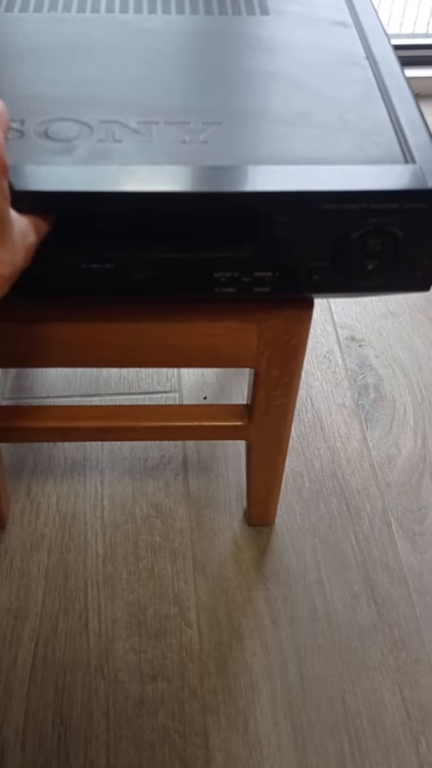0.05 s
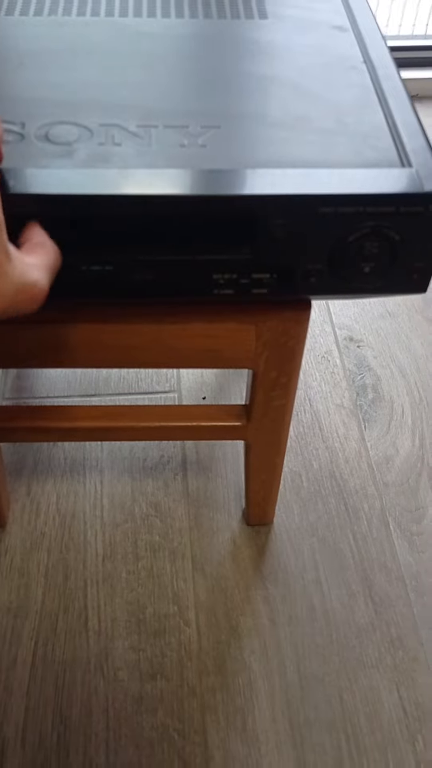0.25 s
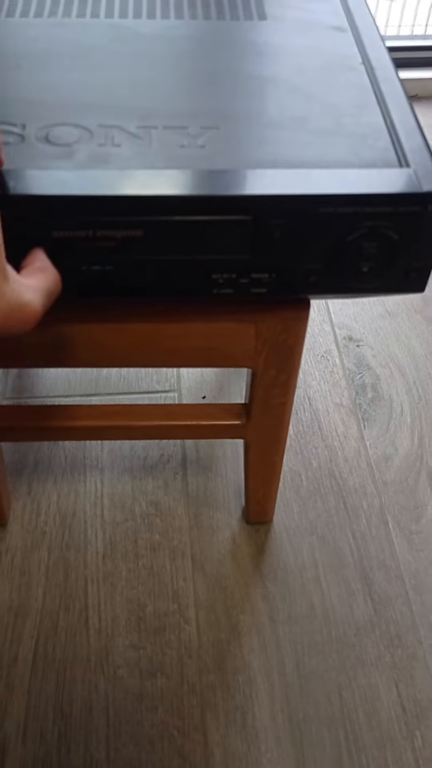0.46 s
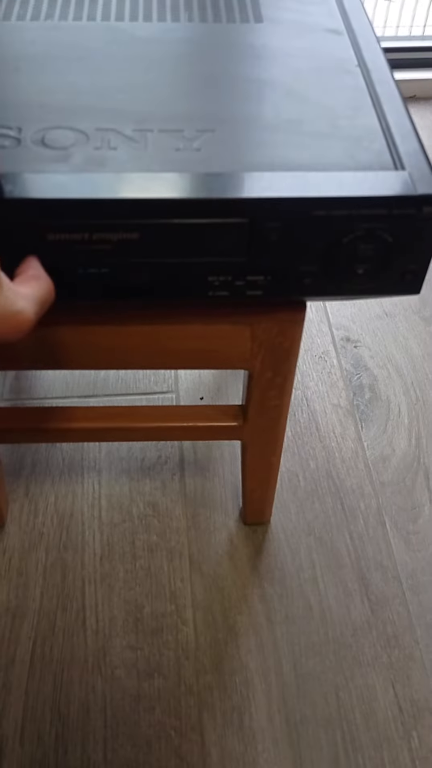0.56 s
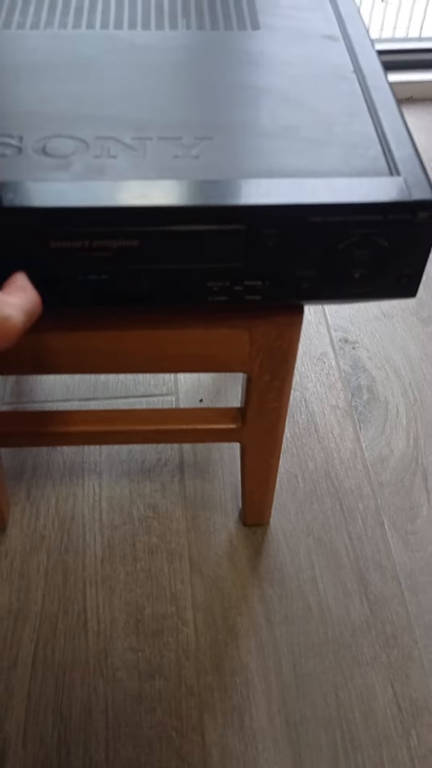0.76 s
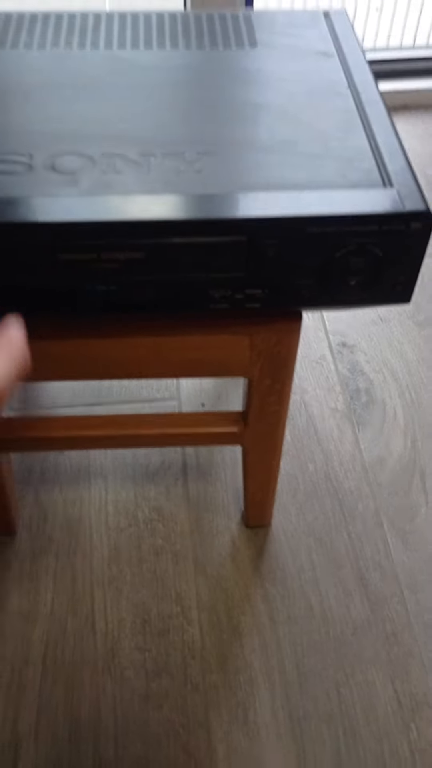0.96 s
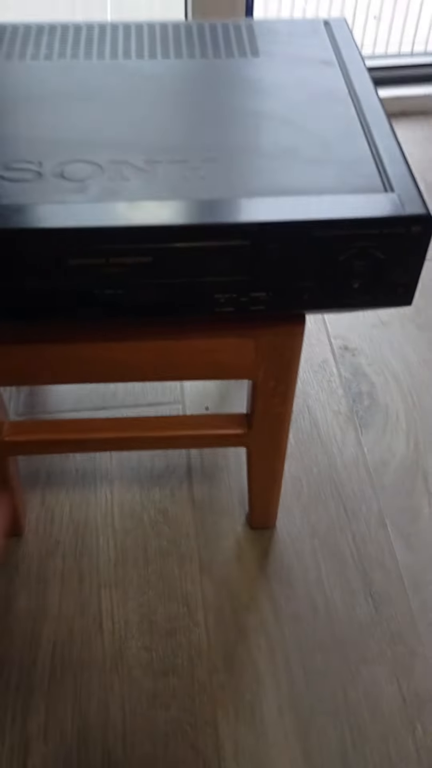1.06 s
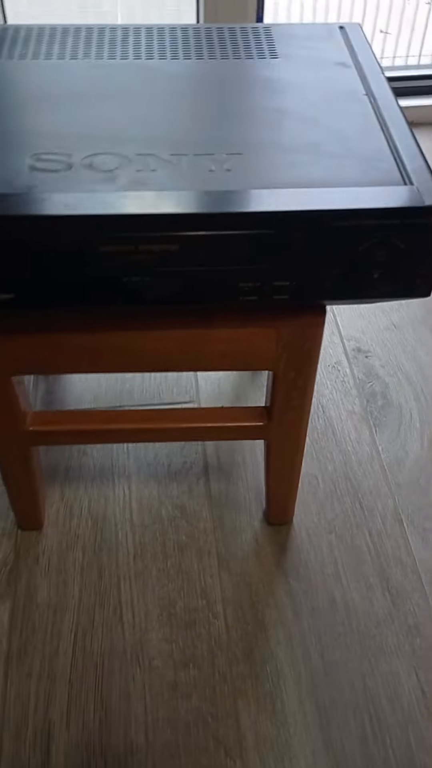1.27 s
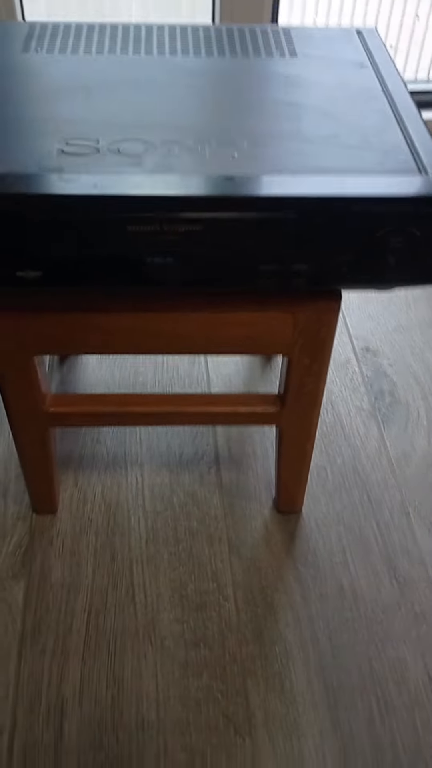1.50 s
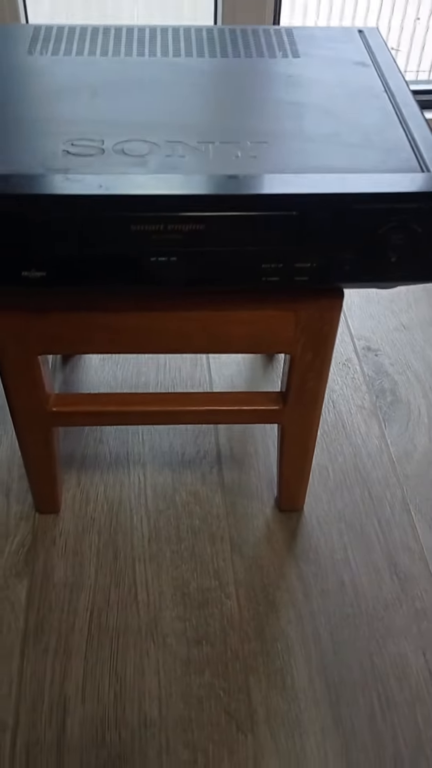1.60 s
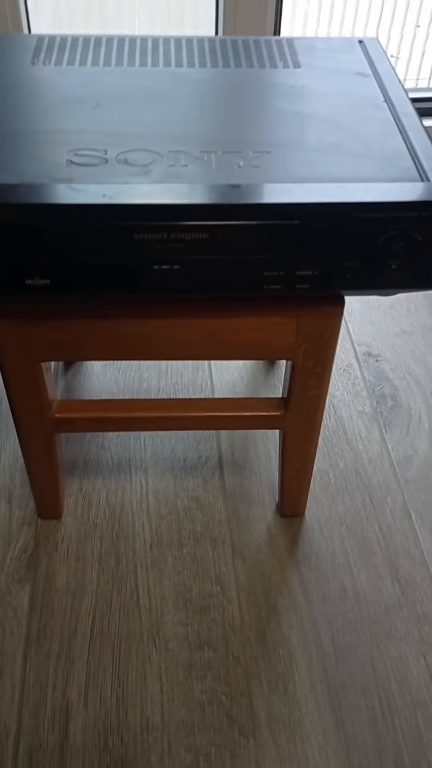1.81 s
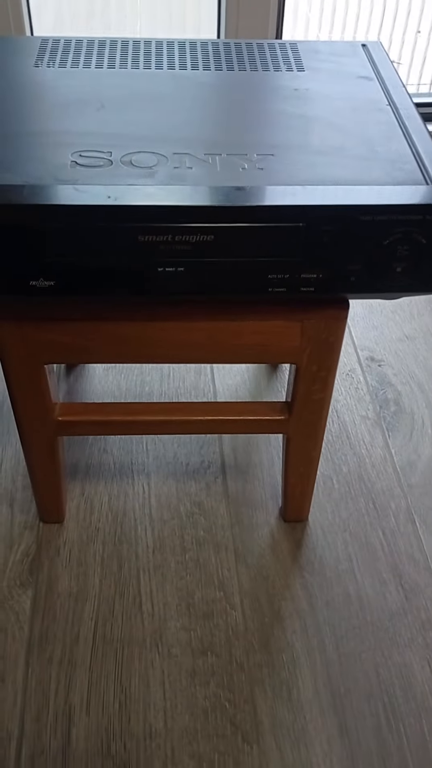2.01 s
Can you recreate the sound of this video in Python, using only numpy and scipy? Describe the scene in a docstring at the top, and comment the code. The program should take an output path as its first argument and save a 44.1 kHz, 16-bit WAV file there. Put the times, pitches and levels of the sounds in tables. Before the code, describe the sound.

A cassette slides rattling into a video recorder and drops with a loud clunk that rings the metal case. A short motor whir with grinding gears follows, then a sharp click and faint ticks in a quiet room.

```python
"""A small, quiet room, with the thin whistle of a picture tube. A cassette is pushed into a video tape
deck: its plastic shell scrapes and rattles through the slot and clacks the flap, then the carriage
clunks and rings the sheet-metal case. The loading motor whirs through its gears, a latch snaps and
small parts settle."""
import sys
import numpy as np
from scipy import signal
from scipy.fft import rfft, irfft
from scipy.io import wavfile
from scipy.ndimage import uniform_filter1d

SR = 44100
rng = np.random.default_rng(int(sys.argv[2]) if len(sys.argv) > 2 else 0)


def master(y):
    """Save y as 16-bit WAV."""
    cut = np.clip(np.atleast_2d(y).T, -1, 1)
    pcm = np.round(cut * 32767)  # scale
    wavfile.write(sys.argv[1], SR, pcm.astype(np.int16))


N = 90404
T = np.arange(N) / SR

# Blows inside the deck. Each row: start in seconds, relative level in dB, rattle decay in seconds,
# tilt in dB per octave, relative level of the case boom in dB.
SHELL_KNOCKS = [(0.0502, -27.5, .004, 1.5, -35), (.1032, -26, .012, 0, -34.5),
                (0.1578, -23, .004, 1.5, -33.5), (.2099, -10.5, .005, -0.5, -28),
                (0.253, -11.5, .005, 1.5, -20), (0.2834, -11, .005, -0.5, -27), (.301, -6, .008, 1, -15),
                (0.3081, -3.5, 0.0074, 4, -12.5), (0.3269, -2.5, .005, -0.5, -9),
                (.341, -11, 0.002, -6.5, -7.5), (.386, -3.5, .003, -9, -15.5),
                (0.4258, -9, .006, -3.5, -17.5), (.444, -25, .004, -6.5, -17)]
CARRIAGE_CLUNKS = [(0.471, -4, .008, -1, -31), (0.4813, 6.5, 0.009, 1.5, -7),
                   (0.4864, 1.5, .003, -5.5, -22.5), (0.5058, 4.5, .004, -1, 3),
                   (0.516, -6, .004, -0.5, -21), (.541, -4, .006, -3, -12.5), (.553, -27.5, .005, -4, -13)]
GEAR_CLACKS = [(.70, -24, 0.005, -2.5, -18), (0.728, -13.5, 0.017, -2, -24),
               (0.761, -19.5, 0.0049, -4, -31), (0.8754, -24, 0.0064, 3.5, -35),
               (0.99, -12.5, 0.0068, 3, -34), (1.002, -22, 0.0026, -1, -55), (1.0222, -15, 0.014, 2.5, -55),
               (1.12, -21, 0.0077, -4, -30), (1.137, -27, 0.0043, -4, -42),
               (1.2094, -30.5, 0.021, 0.5, -60)]
# Tone colours of the cassette shell and the gears. Each row: frequency in Hz, level in dB.
SHELL_COLOUR = [(60, -27), (200, -11), (450, 0), (640, -2.5), (1050, -2), (1500, -3), (2050, -0.5),
                (3000, -7), (3800, -9), (4100, -4), (4380, -9.5), (4650, -1.5), (4950, -8.5), (5400, -5),
                (5750, -8), (6700, -4), (7200, -8), (8000, -18.5), (10000, -30), (15000, -48.5)]
GEAR_COLOUR = [(60, -25.5), (250, -9), (450, 1.5), (950, 4.5), (1500, -2), (2400, -4), (4400, -13.5),
               (6800, -13.5), (8200, -27.5), (12000, -53), (15000, -52)]


def amp(db):
    """Decibels to gain."""
    return 10 ** (np.asarray(db) / 20)


def unit(x):
    """Scale to an energy of one."""
    return x / np.sqrt(np.sum(x ** 2) + 1e-18)


def curve(rows, column=1):
    """One column of a table, joined by straight lines in time."""
    rows = np.array(rows)
    return np.interp(T, rows[:, 0], rows[:, column])


def through(x, response):
    """Pass a sound through an impulse response."""
    return signal.fftconvolve(x, response)[:N]


def colour(points, tilt_db=0, size=4096):
    """Causal response of unit energy with the given spectrum, tilted per octave."""
    octave = np.log2(np.maximum(np.fft.rfftfreq(size, 1 / SR), 10))
    hz, db = np.array(points).T
    tilt = tilt_db * np.clip(octave, np.log2(250), np.log2(8000))
    cepstrum = irfft(np.log(amp(np.interp(octave, np.log2(hz), db) + tilt)))
    cepstrum[1:size // 2] *= 2  # minimum phase keeps attacks sharp
    cepstrum[size // 2 + 1:] = 0
    return unit(irfft(np.exp(rfft(cepstrum))))


def even(x, width_hz):
    """Smooth out chance peaks and holes in the spectrum of a burst."""
    size = 4 * len(x)
    spectrum = rfft(x, size)
    power = uniform_filter1d(abs(spectrum) ** 2, max(int(width_hz * size / SR), 1))
    return unit(irfft(spectrum / np.sqrt(power + 1e-6 * power.mean()))[:len(x)])


def tail(t60, build_s):
    """Dense, diffuse ringing that lasts t60 seconds at 1 kHz; the treble dies first."""
    t = T[:2 ** 15]
    noise = rfft(rng.standard_normal(len(t)))
    octave = np.clip(np.log2(np.fft.rfftfreq(len(t), 1 / SR) / 1000 + 1e-9), -3, 3)
    wash = np.zeros(len(t))
    for k in range(-3, 4):
        band = irfft(noise * np.maximum(1 - abs(octave - k), 0))
        band_t60 = t60 * 2 ** (-0.26 * k)
        wash += band * np.exp(-np.log(1000) * t / band_t60)
    return even(wash * (1 - np.exp(-t / build_s)), width_hz=30)


def flutter(hz):
    """Quick random wavering, rms one."""
    return unit(uniform_filter1d(rng.standard_normal(N), int(SR / hz))) * np.sqrt(N)


def grit():
    """Dense tiny contacts of uneven strength, rms one."""
    return unit(rng.standard_normal(N) * np.exp(0.38 * rng.standard_normal(N))) * np.sqrt(N)


def friction(levels, spectrum, tilt_db=0):
    """Rubbing surfaces: grit in the colour of the part, following a level curve."""
    return amp(curve(levels)) * through(grit(), colour(spectrum, tilt_db))


def strikes(rows):
    """One impulse for each (seconds, dB)."""
    out = np.zeros(N)
    for s, db in rows:
        out[int(s * SR)] += amp(db)
    return out


def ring(force, modes):
    """A struck object rings in its decaying modes."""
    t = T[:SR // 2]
    response = sum((-1) ** k * amp(db) * np.sin(2 * np.pi * hz * t) * np.exp(-np.log(1000) * t / t60)
                   for k, (hz, db, t60) in enumerate(modes))
    return through(force, response)


def rattles(rows, spectrum, rise_s, size=4096):
    """Each blow swells, chatters briefly and takes on the colour of the part."""
    out, contacts, t = np.zeros(N), grit(), T[:size]
    for s, db, rattle_s, tilt_db, _ in rows:
        start = int(s * SR)
        envelope = (1 - np.exp(-t / rise_s)) * np.exp(-t / rattle_s)
        burst = even(contacts[start:start + size] * envelope, width_hz=340)
        blow = amp(db) * unit(signal.fftconvolve(burst, colour(spectrum, tilt_db)))
        out[start:start + len(blow)] += blow
    return out


def room_air():
    """Still air: a faint, dark bed of noise."""
    # Colour of the air. Each row: frequency in Hz, level in dB.
    spectrum = [(25, -19.5), (55, 10), (100, 2), (220, 6), (450, -3.5), (1000, -6), (2500, -22),
                (7000, -25.5), (9000, -37.5), (15000, -41)]
    return amp(-76) * through(rng.standard_normal(N), colour(spectrum))


def tube_whistle(hz=15623):
    """The picture tube holds one thin, high pitch while its level flickers."""
    # Swells and dips of the whistle. Each row: time in seconds, rms level in dB.
    levels = [(0.0, -70.5), (0.14, -73), (0.25, -84), (0.28, -74), (0.46, -71), (0.48, -57), (0.56, -66),
              (0.59, -71.5), (0.89, -64), (0.99, -78), (1.05, -64.5), (1.12, -68), (1.37, -65.5),
              (1.41, -52), (1.44, -64.5), (1.87, -81), (1.94, -73.5), (2.05, -75)]
    envelope = np.sqrt(2) * amp(curve(levels)) * (1 + 0.1 * flutter(110))
    return envelope * np.sin(2 * np.pi * hz * T)


def shell_scrape():
    """The shell's edge rasps into the slot and its body slides in with a duller rub."""
    # Friction of the body and of the edge. Each row: time in seconds, level in dB.
    slide = [(0, -99), (.045, -90), (.08, -59), (.13, -66), (.20, -62.5), (.23, -50.5), (.29, -50.5),
             (.35, -45), (.41, -51), (.46, -56.5), (.50, -82)]
    rasp = [(.045, -95), (.053, -57), (.08, -72), (.09, -56.5), (.125, -56), (.15, -65), (.20, -71),
            (.24, -100)]
    # Colour of the rasp. Each row: frequency in Hz, level in dB.
    rasp_colour = [(300, -24.5), (900, -11.5), (1250, -1), (2300, 3.5), (3100, -8.5), (4200, -7),
                   (5000, -16.5), (6600, -11.5), (8000, -28.5), (15000, -48.5)]
    return friction(slide, SHELL_COLOUR, tilt_db=-3) + friction(rasp, rasp_colour)


def deck_thuds():
    """Soft, low swells of noise as the deck shifts."""
    # Bumps and groans. Each row: peak time in seconds, level in dB, pitch in Hz, half-width in seconds.
    bumps = [(.04, -67.5, 380, .035), (0.9, -55.5, 180, 0.027), (1.352, -63.5, 180, 0.018),
             (1.36, -74, 92, 0.022), (1.71, -74, 54, .04), (1.594, -70, 630, 0.019),
             (0.745, -57.5, 388, 0.041), (0.42, -46.5, 380, 0.0028), (.515, -49, 140, 0.008),
             (1.94, -71, 530, 0.026)]
    out = np.zeros(N)
    for s, db, hz, width_s in bumps:
        spectrum = [(hz / 4, -35), (hz / 1.4, -9), (hz, 0), (hz * 1.4, -11), (hz * 4, -55)]
        band = through(rng.standard_normal(N), colour(spectrum))
        swell = np.exp(-.5 * ((T - s) / width_s) ** 2)
        out += amp(db) * unit(band * swell) * np.sqrt(2 * width_s * SR)
    return out


def loading_blows():
    """The shell knocks, the carriage clunks and the gears clack; the panels ring on."""
    # Colour of the carriage. Each row: frequency in Hz, level in dB.
    carriage_colour = [(60, -27), (135, -7.5), (214, -13.5), (400, 0.5), (750, -3), (1130, -4), (1540, -1),
                       (2300, -6), (3000, -11), (3900, -3), (5550, -2), (6700, -3.5), (7800, -17),
                       (9100, -14), (10000, -23), (15000, -40)]
    knocks = amp(-8) * rattles(SHELL_KNOCKS, SHELL_COLOUR, rise_s=.0018)
    clunks = amp(-8.5) * rattles(CARRIAGE_CLUNKS, carriage_colour, rise_s=.002)
    clacks = amp(-7) * rattles(GEAR_CLACKS, GEAR_COLOUR, rise_s=.0044)
    blows = knocks + clunks + clacks
    panels = through(blows, tail(t60=.35, build_s=.0028))
    return amp(-1) * blows + amp(-5.5) * panels


def body_resonance(soft_contact_hz=1100):
    """Every blow booms in the case, the hard carriage most brightly; knocks also ring the shell."""
    # Modes of the metal case and the hollow shell. Each row: pitch in Hz, level in dB, t60 in seconds.
    case_modes = [(73, -19.5, 0.7), (137, -14.5, 0.35), (236.4, -17, 0.47), (294.8, -5, 0.13),
                  (338.5, -2.5, .38), (377, 2.5, 0.44), (456, -2, 0.45), (480.4, -1, 0.4), (718, -5, .25),
                  (755, 3, 0.19), (827, -9, .22), (1468, -7.5, 0.088), (1528, -5.5, .25), (4060, -10, 0.12),
                  (4250, -7.5, 0.16), (4620, -25.5, .22), (5537, -13.5, .24), (6750, -12, 0.22),
                  (9300, -24, .2)]
    shell_modes = [(440, -2, 0.18), (618, 2.5, 0.22), (816, 1, 0.31), (1714, -7.5, .12), (1995, -5, .14),
                   (2300, -5, .14), (6690, -7.5, .08)]
    soften = signal.butter(2, soft_contact_hz, fs=SR, output="sos")
    soft = signal.sosfilt(soften, strikes((s, db) for s, *_, db in SHELL_KNOCKS + GEAR_CLACKS))
    hard = strikes((s, db) for s, *_, db in CARRIAGE_CLUNKS)
    knocks = strikes(row[:2] for row in SHELL_KNOCKS)
    return amp(-43) * ring(soft + hard, case_modes) + amp(-47) * ring(knocks, shell_modes)


def slot_flap():
    """The flap clacks and its spring pings."""
    # Strikes on the flap and the spring. Each row: start in seconds, level in dB.
    hits = [(.2105, -45)]
    plucks = [(.4249, -68.5)]
    # Their modes. Each row: pitch in Hz, level in dB, t60 in seconds.
    flap_modes = [(820, -6, .08), (1130, -2, .1), (1213, -2.5, 0.27), (1343, -3, .08), (5200, -6, 0.077)]
    spring_modes = [(9880, 0.5, .07), (11300, -10, .04)]
    return ring(strikes(hits), flap_modes) + ring(strikes(plucks), spring_modes)


def gear_grind():
    """The gears grind in uneven surges."""
    # Friction of the gears. Each row: time in seconds, level in dB.
    levels = [(.62, -66.5), (.70, -64), (.745, -60), (.785, -62), (.81, -81), (.86, -75.5), (.89, -56.5),
              (.97, -61.5), (1.03, -53.5), (1.09, -59), (1.135, -56.5), (1.17, -79), (1.22, -74.5),
              (1.29, -85.5), (1.55, -75), (1.62, -71), (1.72, -78), (2.05, -85)]
    return friction(levels, GEAR_COLOUR)


def loading_motor():
    """The motor spins up, whines and winds down, each partial wavering under the load."""
    # The motor's run. Each row: time in seconds, base frequency in Hz, level in dB.
    run = [(.86, 132.5, -66), (.91, 141.3, -58.5), (.96, 149.8, -55.5), (1.04, 150.9, -57),
           (1.12, 151.9, -57), (1.2, 147.3, -70), (1.25, 134.8, -100)]
    # Shaft and gear partials. Each row: multiple of the base frequency, level in dB.
    partials = [(3, -3), (4, -3.5), (5, -12.5), (6, -6.5), (6.6, -7.5), (8.2, -13)]
    phase = 2 * np.pi * np.cumsum(curve(run) * (1 + .02 * flutter(100))) / SR
    whine = sum(amp(db) * (1 + 0.4 * flutter(70)) * np.sin(k * phase) for k, db in partials)
    running = (T > run[0][0]) & (T < run[-1][0])
    return running * amp(curve(run, column=2)) * whine


def sliding_parts():
    """Parts slide over each other with a soft hiss."""
    # Swells of the hiss. Each row: time in seconds, level in dB.
    levels = [(1.30, -95.5), (1.335, -77.5), (1.39, -75.5), (1.43, -87), (1.49, -77.5), (1.55, -82),
              (1.68, -96), (1.75, -102)]
    # Its colour. Each row: frequency in Hz, level in dB.
    spectrum = [(200, -29.5), (1200, -7), (2100, -1), (3000, -2.5), (4500, 1), (7000, 1), (8500, -13.5),
                (15000, -21)]
    return friction(levels, spectrum)


def small_parts(crack_rise_s=.0006):
    """A pawl ticks, the latch snaps and a lever settles; each rings and crackles in the housing."""
    # Strikes on each part. Each row: start in seconds, level in dB.
    ticks = [(.8775, -55), (1.879, -55), (1.8806, -56)]
    snaps = [(1.4045, -45), (1.4078, -36.5)]
    taps = [(1.8145, -58), (1.836, -59)]
    # Modes of each part. Each row: pitch in Hz, level in dB, t60 in seconds.
    pawl = [(3700, -18, 0.032), (6630, -4.5, 0.021), (7320, -6, 0.014), (9620, -16, .015)]
    latch = [(1314, -4.5, 0.0085), (1713, 0, 0.021), (1625, -27, 0.086), (2070, -11, 0.014),
             (2430, -8, 0.014), (2850, -11.5, 0.024), (3920, -3.5, 0.014), (4250, -3, 0.014),
             (4240, -26, .11), (6590, -9, 0.018), (7230, -17, 0.027), (8430, -21, 0.014),
             (9920, -20.5, 0.012)]
    lever = [(735, 1, 0.07), (802, -2.5, 0.16), (852, 0, 0.045), (910, -2, .05), (1100, -7, 0.096),
             (1440, -8, 0.055), (5030, -14, 0.059), (5620, -12.5, 0.045)]
    # Colour of the housing. Each row: frequency in Hz, level in dB.
    housing = [(300, -25), (900, -10.5), (1700, -2), (2800, 1.5), (3400, -8), (4100, 1.5), (5300, -9),
               (7000, -13), (9000, -26), (15000, -32)]
    out = np.zeros(N)
    for hits, modes, crack_db, crack_s in (
            (snaps, latch, 9, .023), (taps, lever, 11, .017), (ticks, pawl, 5.5, .0043)):
        force = strikes(hits)
        envelope = (1 - np.exp(-T / crack_rise_s)) * np.exp(-T / crack_s)
        crack = unit(through(grit() * envelope, colour(housing)))
        out += ring(force, modes) + amp(crack_db) * through(force, crack)
    return out


def scene():
    """The deck over still air and the tube's whistle; its lighter sounds echo in the small room."""
    light_parts = slot_flap() + loading_motor() + small_parts() + deck_thuds()
    room = amp(-10) * through(light_parts, tail(t60=.28, build_s=.0086))
    background = room_air() + tube_whistle()
    impacts = loading_blows() + body_resonance()
    rubbing = shell_scrape() + gear_grind() + sliding_parts()
    return (impacts + rubbing + light_parts + room + background)[None]


def record(dry, low_cut_hz=34, top_hz=16100):
    """Thin the deep bass and cut the very top."""
    thin = signal.sosfilt(signal.butter(4, low_cut_hz, "high", fs=SR, output="sos"), dry)
    return signal.sosfilt(signal.ellip(10, .1, 80, top_hz, fs=SR, output="sos"), thin)


dry = scene()
out = record(dry)
master(out)
```